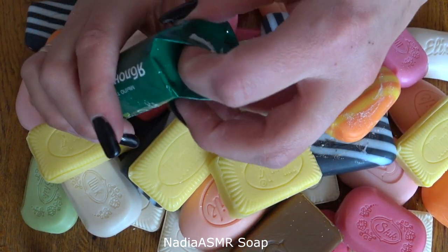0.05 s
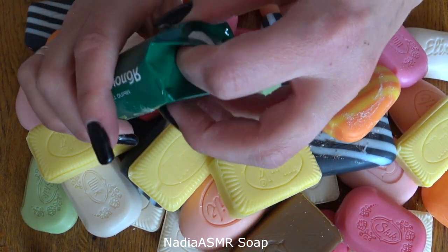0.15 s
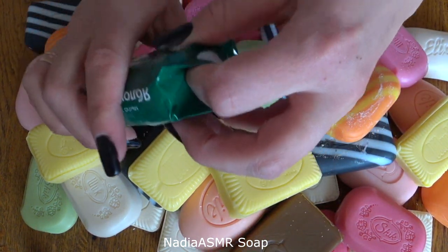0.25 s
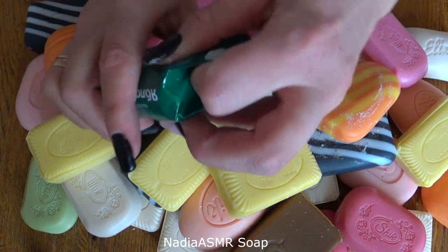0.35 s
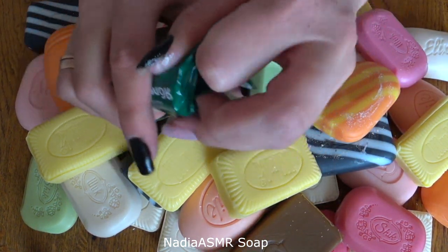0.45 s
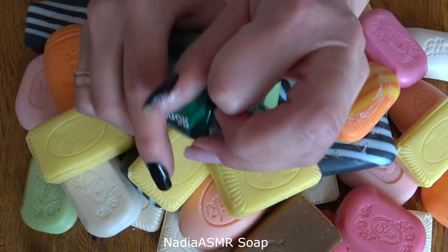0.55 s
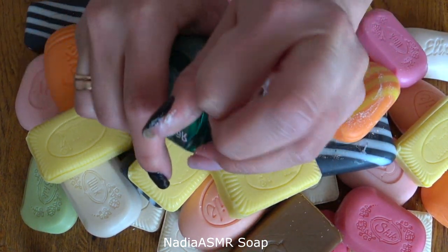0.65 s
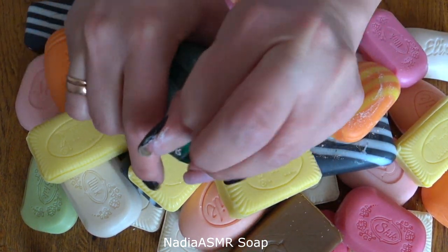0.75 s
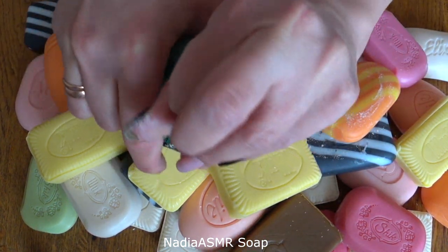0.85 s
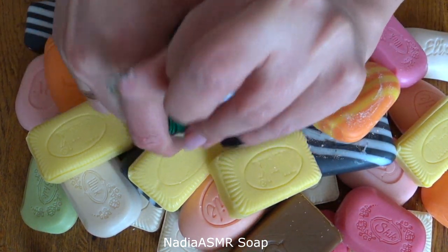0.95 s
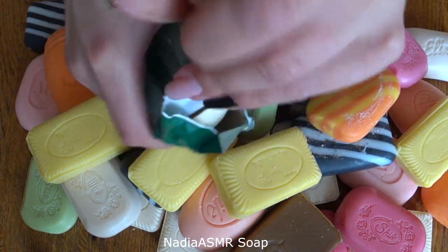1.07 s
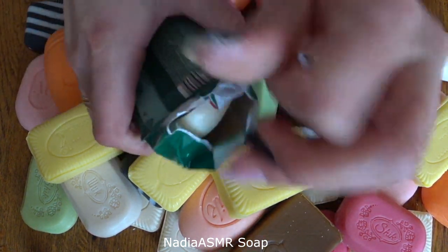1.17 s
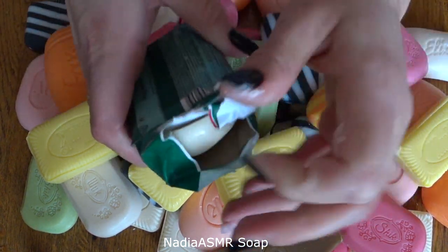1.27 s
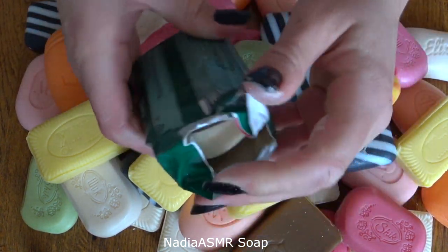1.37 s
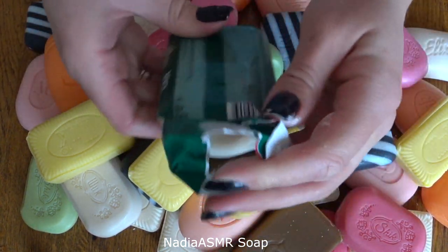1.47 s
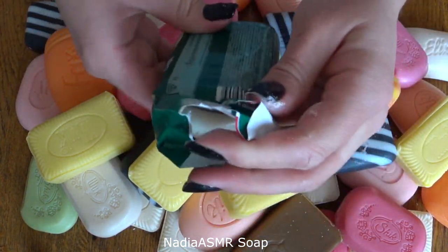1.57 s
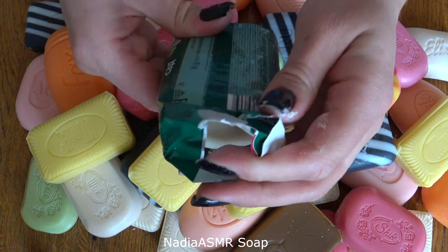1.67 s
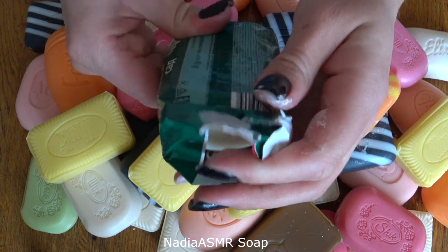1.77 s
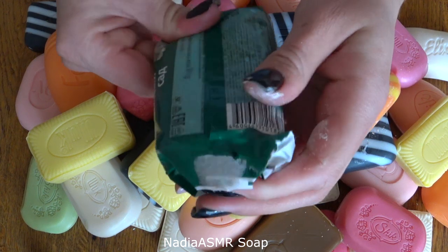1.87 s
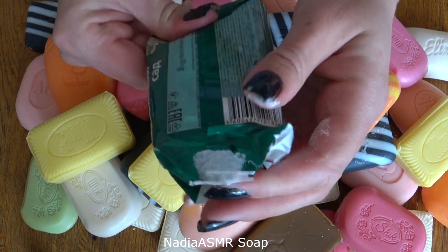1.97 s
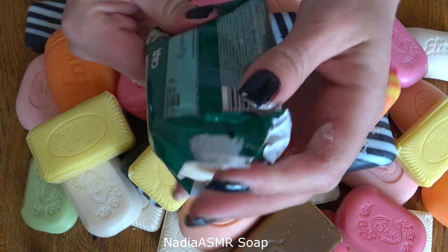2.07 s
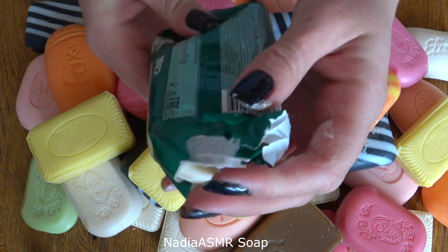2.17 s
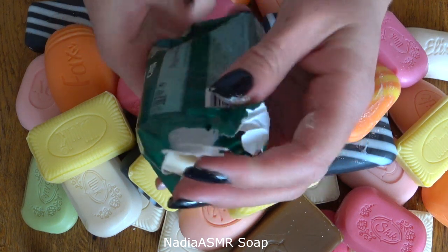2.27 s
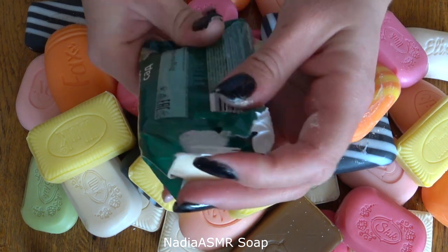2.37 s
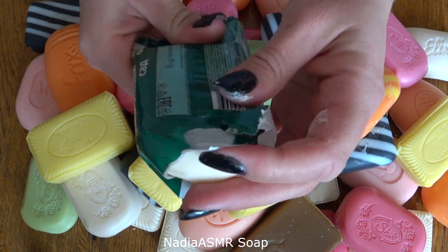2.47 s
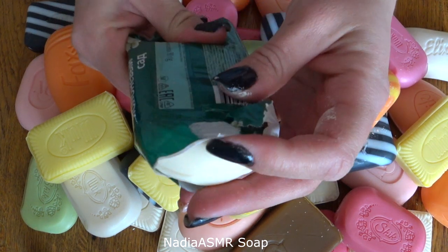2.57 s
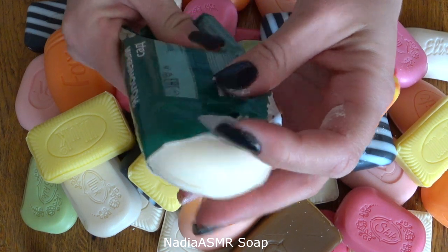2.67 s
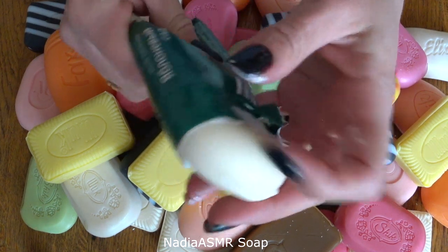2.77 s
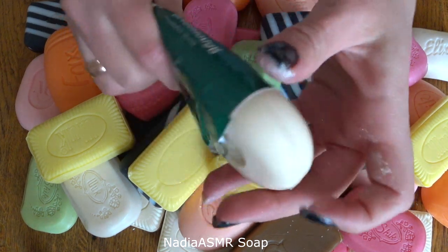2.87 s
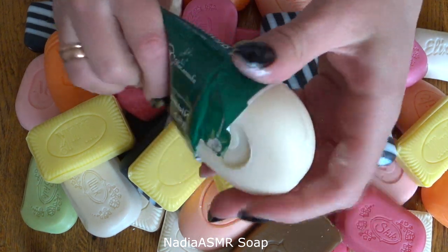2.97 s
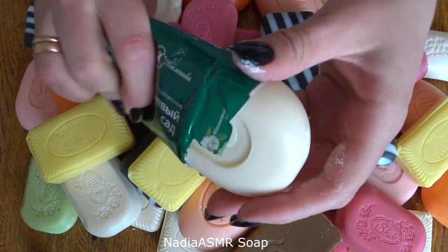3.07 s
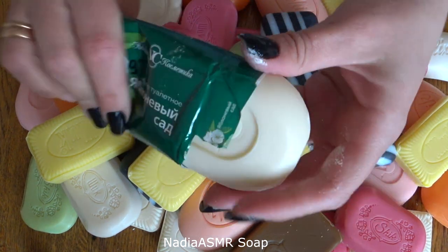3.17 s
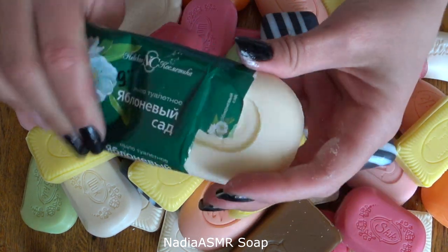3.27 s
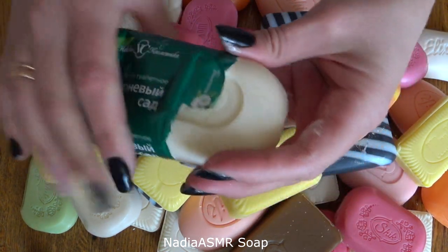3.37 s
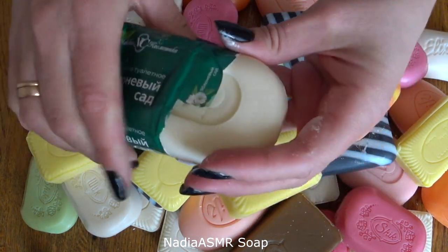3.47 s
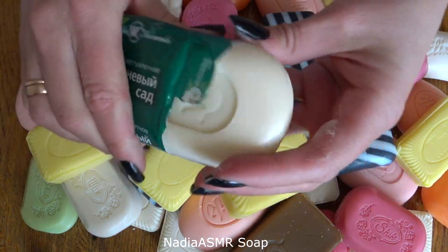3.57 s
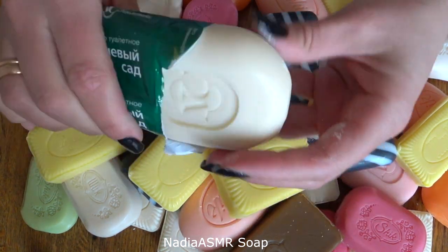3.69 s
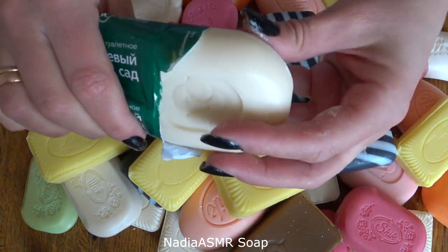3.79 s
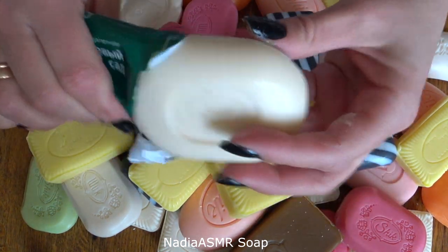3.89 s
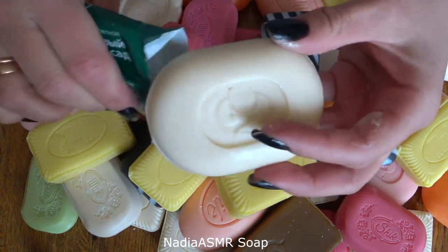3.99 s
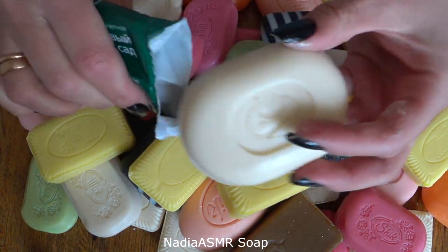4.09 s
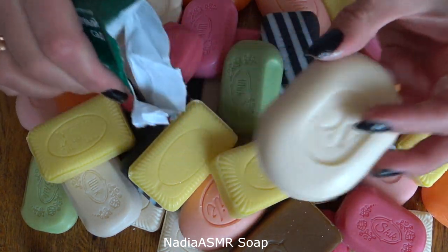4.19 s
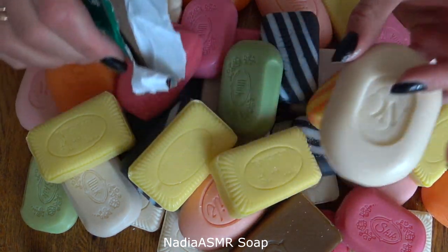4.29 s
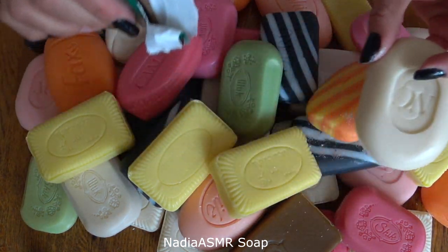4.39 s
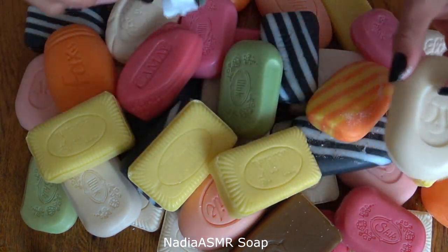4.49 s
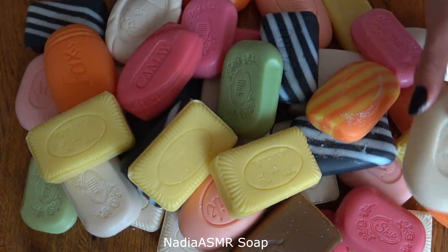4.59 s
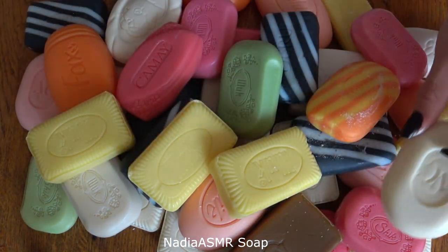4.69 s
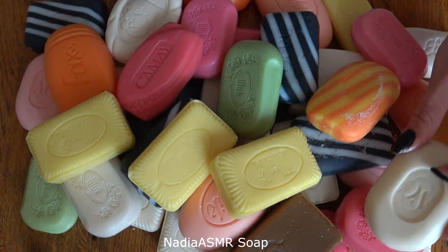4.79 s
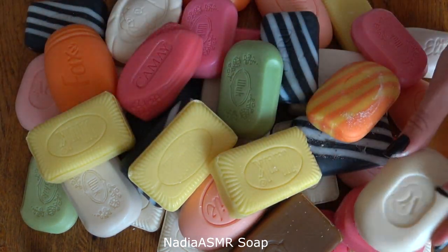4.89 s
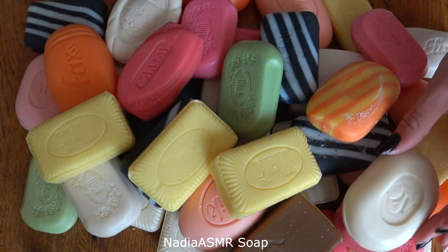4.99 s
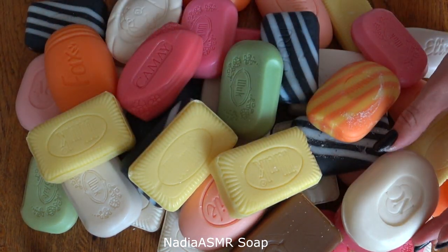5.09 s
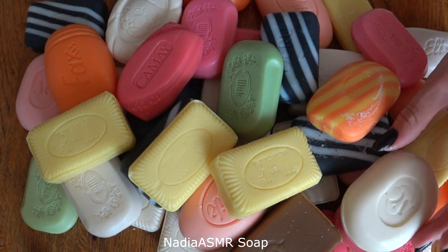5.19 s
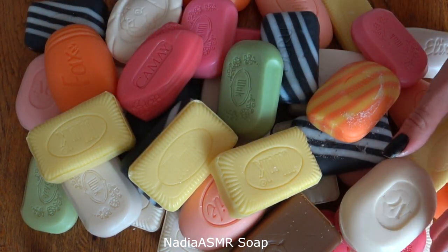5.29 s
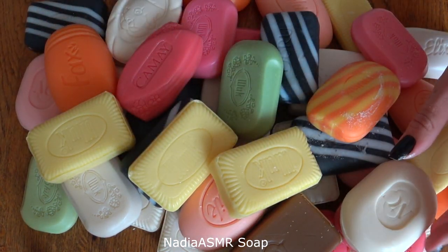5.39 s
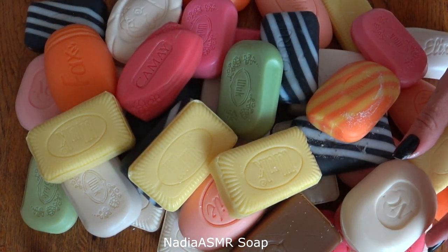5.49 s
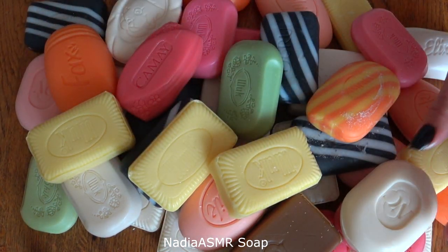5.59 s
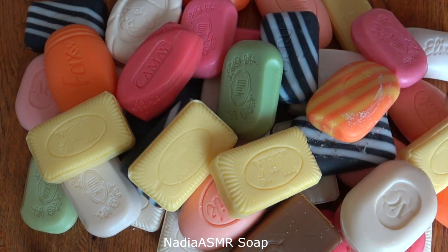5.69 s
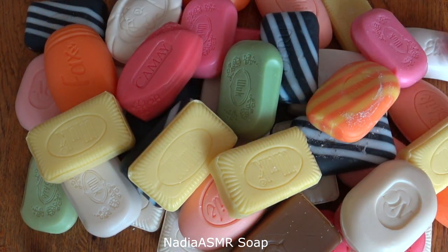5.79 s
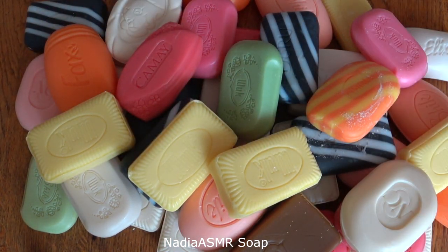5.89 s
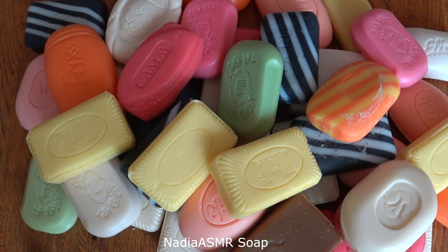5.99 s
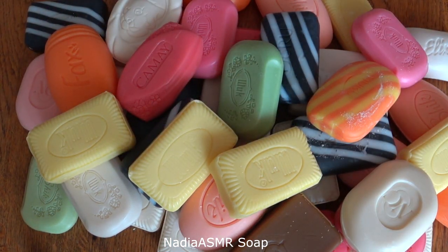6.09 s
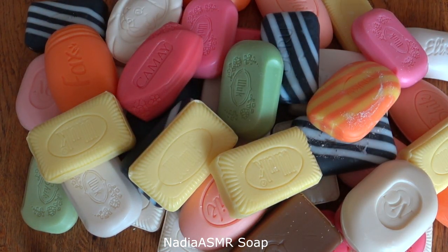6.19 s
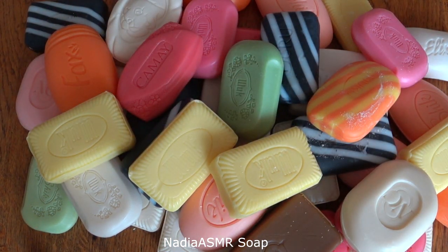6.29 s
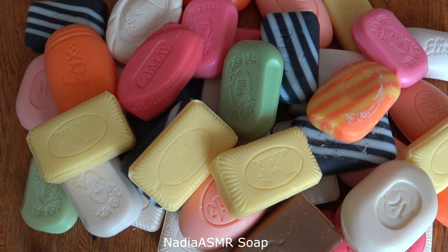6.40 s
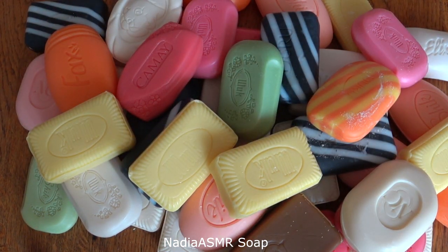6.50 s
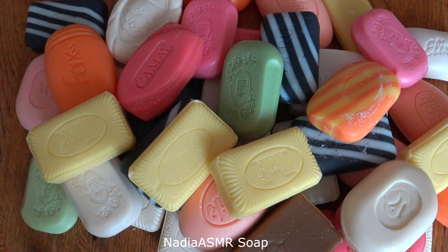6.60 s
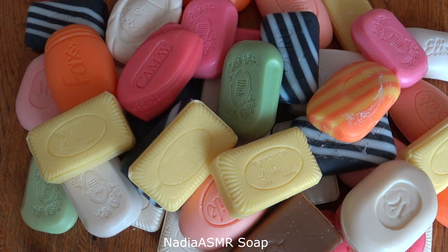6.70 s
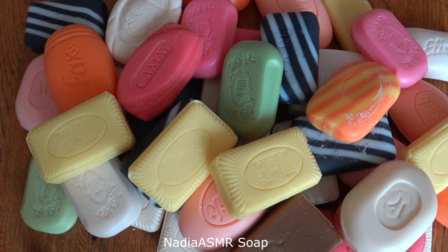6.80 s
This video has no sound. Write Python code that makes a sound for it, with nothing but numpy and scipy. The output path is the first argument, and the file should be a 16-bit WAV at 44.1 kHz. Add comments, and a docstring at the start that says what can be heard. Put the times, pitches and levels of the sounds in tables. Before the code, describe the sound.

Close, crisp crackling of a plastic soap wrapper peeled by hand, followed by a knock and softer taps as the bar is laid down.

```python
"""Unwrapping a bar of soap

Hands crumple, tear and peel the film close to a stereo microphone. Creases buckle one by one, each
ringing a small panel, over fine crackle, sliding friction and the thumps of fingers on the bar.
Laid on a wooden table, the bar knocks three times; a small quiet room answers over hum and hiss."""
import sys
import numpy as np
from scipy import signal
from scipy.fft import rfft, irfft
from scipy.io import wavfile
from scipy.ndimage import uniform_filter1d

SR = 44100
rng = np.random.default_rng(int(sys.argv[2]) if len(sys.argv) > 2 else 0)


def generate_wav(signal):
    """Clip the signal to [-1, 1] and save it as 16-bit WAV at the path in sys.argv[1]."""
    frames = np.transpose(np.atleast_2d(signal))
    scaled = np.clip(frames, -1, 1) * 32767
    pcm = np.round(scaled).astype(np.int16)
    wavfile.write(sys.argv[1], SR, pcm)


N = 302085
TOP_HZ = 10950
SIDES = np.array([[1], [-1]])  # opposite signs for left and right


def undb(db):
    """Amplitude ratio of a level in decibels."""
    return 10 ** (np.asarray(db) / 20)


def level(x, db):
    """Normalisation to an rms level."""
    return x * undb(db) / np.sqrt(np.mean(x ** 2))


def band(x, lo_hz, hi_hz, order=2):
    """Butterworth band-pass filtering."""
    return signal.sosfilt(signal.butter(order, [lo_hz, hi_hz], "bandpass", fs=SR, output="sos"), x)


def coloured(spectrum):
    """Spectral shaping of white noise by (frequency [Hz], level [dB]) points."""
    hz, db = np.transpose(spectrum)
    size = N + 1
    f = np.fft.rfftfreq(size, 1 / SR) + 1
    gain = undb(np.interp(np.log(f), np.log(hz), db))
    return irfft(rfft(rng.standard_normal(size)) * gain, size)[:N]


def add(out, s, x, pan_db):
    """Superposition of a sound at time s, with a left-minus-right level difference."""
    i = int(s * SR)
    x = x[:N - i]
    out[:, i:i + len(x)] += x * undb(SIDES * pan_db / 2)


# Background spectra, mid and side: (frequency [Hz], relative density [dB])
MID_SPECTRUM = [(15, -48), (25, -7), (54, -8.5), (75, -10), (151, -12), (176, -10), (221, -10.5),
                (309, -14), (420, -15.5), (478, -20), (5190, -33), (10600, -30), (11500, -27), (15000, -77),
                (22000, -120)]
SIDE_SPECTRUM = [(15, -33), (25, -29), (54, -4), (117, -2.5), (360, 0.5), (798, -0.5), (1270, -2),
                 (5610, -19), (7630, -15.5), (10600, -20), (11500, -17), (15000, -66), (22000, -120)]
# Mains hum and a faint high tone: (frequency [Hz], rms level [dB])
HUM_TONES = [(50, -68), (150, -80.5), (9711, -101)]
def background(mid_db=-65, side_db=-59.5):
    """Stationary noise: room murmur and microphone hiss spread wide around a centred hum."""
    t = np.arange(N) / SR
    hum = sum(np.sqrt(2) * undb(db) * np.sin(2 * np.pi * hz * t) for hz, db in HUM_TONES)
    return hum + level(coloured(MID_SPECTRUM), mid_db) + SIDES * level(coloured(SIDE_SPECTRUM), side_db)


# The thud, crack and tick bands of a crease: (lower edge [Hz], upper edge [Hz])
CREASE_BANDS = [(520, 1600), (1600, 4500), (4500, 11500)]
BURST_MS, LEAN_DB = [1.45, 1.83, 1], [3, 3.5, -0.7]  # per band: decay time; left minus right
# Crackle envelope: (time [s], crack level [dB], thud level [dB], tick level [dB])
CRACKLE_LEVELS = [(0.0, -64, -60, -54), (0.23, -42.5, -46.5, -46.5), (0.38, -53, -56.5, -46),
                  (0.65, -48, -60, -47), (0.84, -56, -76, -44), (1.05, -36.5, -54, -35),
                  (1.16, -59, -66, -56), (1.41, -56.5, -63, -55), (1.89, -52, -66, -49),
                  (2.27, -58.5, -63.5, -55), (2.46, -60, -58.5, -53.5), (2.61, -55, -57.5, -39.5),
                  (2.67, -44, -55, -36.5), (2.8, -61, -64, -61), (2.94, -62, -76, -61),
                  (3.2, -63, -68, -50.5), (3.39, -63, -63.5, -61.5), (3.57, -63.5, -59.5, -55.5),
                  (3.68, -43.5, -43, -42.5), (3.79, -55, -55, -60), (3.87, -52, -57, -54.5),
                  (3.97, -44.5, -41, -66), (4.1, -54, -69, -52.5), (4.23, -72, -71, -67.5),
                  (4.43, -78.5, -75.5, -73.5), (4.88, -81, -82, -75), (5.02, -74, -66, -74.5),
                  (5.15, -78.5, -77, -78), (5.42, -72.5, -76, -73), (5.99, -67.5, -64.5, -66),
                  (6.26, -77.5, -73, -76), (6.85, -84, -77, -84)]
def crackle(per_second=600, spread_db=2.5, colour_db=4, rub=0.45, taut_hz=(3050, 3650), taut_db=-15):
    """Shot noise: tiny creases give way at random over the smooth rub of skin on film."""
    s, crack_db, thud_db, tick_db = np.transpose(CRACKLE_LEVELS)
    t, out = np.arange(N) / SR, 0
    struck = rng.random(N) < per_second / SR
    size_db = np.minimum(spread_db * rng.exponential(size=N), 9)
    pan_db = 3 * rng.standard_normal(N)
    for k, db in enumerate([thud_db, crack_db, tick_db]):
        tint_db = colour_db * np.clip(rng.standard_normal(N), -2, 2)
        kicks = struck * undb(size_db + tint_db + SIDES * (pan_db + LEAN_DB[k]) / 2)
        fade = np.exp(-1000 / (BURST_MS[k] * SR))
        envelope = level(signal.lfilter([1], [1, -fade], kicks), 0) + rub
        grains = band(envelope * rng.standard_normal(N), *CREASE_BANDS[k], order=3)
        out = out + level(grains, np.interp(t, s, db))
    taut = band(envelope * rng.standard_normal(N), *taut_hz)  # stretched film sings with the tick band
    return out + level(taut, taut_db + np.interp(t, s, tick_db))


# Buckling creases: (time [s], level [dB], panel frequency [Hz],
# relative thud level [dB], relative crack level [dB], relative tick level [dB])
CREASES = [(0.022, -20.5, 8200, -16, -12, -17), (0.035, -21, 1970, -38, -4, -1),
           (0.065, -38, 1340, 1.5, -14, -4.5), (0.097, -23.5, 1280, -4, -12, -21),
           (0.12, -23.5, 4240, -8, 2, 7.5), (0.126, -27, 3400, -13, -17, 6),
           (0.161, -19, 1970, -16, -23, -2), (0.187, -11.5, 2630, -16, -35, 2.5),
           (0.249, -9.5, 2060, -29, -6.5, -1), (0.261, -22, 1320, 2.5, -1, -4),
           (0.27, -8, 7950, -38, -8, -0.5), (0.289, -36, 2050, -27, -9, -14),
           (0.315, -6.5, 6600, -33, -7, -7.5), (0.329, -26.5, 6030, 0.5, -7, -11),
           (0.359, -12, 1880, -5.5, -13, -25), (0.453, -17.5, 4630, -41, -9.5, -12),
           (0.474, -27, 1380, -27, -13, 3), (0.516, -5, 8000, -34, -15.5, -7.5),
           (0.548, -8.5, 5000, -27, -13.5, -3.5), (0.584, -20, 3140, -11, -1.5, -3),
           (0.589, -10.5, 6550, -16, -19, -3), (0.634, -14, 5780, -36, -15, -1),
           (0.643, -18, 6540, -31, -17, -9), (0.666, -17, 7300, -40, -17, -16),
           (0.673, -10, 6650, -40, -7, 3.5), (0.676, -12.5, 3280, -46, -22, -15),
           (0.688, -25, 2550, -31, 6, 7), (0.694, -8.5, 6150, -43, -15, -3), (0.715, -20, 2480, -36, -3, 0),
           (0.745, -24.5, 3400, -39, -5.5, 5.5), (0.779, -25, 6580, -32, -9, -15),
           (0.799, -35, 7200, -19, -11, -6), (0.804, -22, 6700, -35, -6, -1),
           (0.82, -20, 2460, -25, -10, -4), (0.829, -12, 10100, -34, -17.5, -17),
           (0.891, -22, 3450, -24, -4.5, 3), (0.9, -14, 6920, -33, -25, -9),
           (0.922, -15.5, 5290, -39, -16, -1), (0.933, -5, 6860, -45, -22, -5),
           (0.94, -12.5, 2760, -38, -6, -3), (0.944, -9, 4840, -41, -9.5, -18),
           (0.955, -23, 7500, -35, -20, -11), (0.965, -5.5, 7800, -33, -14, -6),
           (0.972, -10.5, 5330, -48, -14, -5.5), (0.976, -12, 6600, -46, -29, -3),
           (0.984, -14.5, 7550, -40, -27.5, -7), (1.033, -16, 8200, -23, -8, -13.5),
           (1.039, -9.5, 1900, -26, -5.5, -15), (1.043, -7.5, 9870, -20, -14, 0),
           (1.048, -4.5, 5360, -16, -16, -5), (1.058, -16, 2500, -14, -21, -9),
           (1.112, -16.5, 2570, -16, -3, 4), (1.15, -15, 4870, -18, -5.5, -1.5),
           (1.16, -15, 2570, -21, -19, -15), (1.17, -20, 4990, -6.5, -8, -2),
           (1.177, -32, 6050, -24, -2.5, 1), (1.203, -22, 5740, -27, -3.5, -2),
           (1.21, -22, 7250, -25, -21, -3), (1.262, -36, 6330, -6, -20, -1),
           (1.286, -29.5, 6800, -39, -27, 1.5), (1.317, -22.5, 7700, -32, -20.5, -13),
           (1.338, -31, 2670, -11, -9.5, -13), (1.353, -26, 2960, -16, -6, -5),
           (1.371, -7, 6650, -25.5, -10.5, -8.5), (1.385, -10, 8250, -26, -18, -11),
           (1.405, -25.5, 6450, -31, -6, 2), (1.442, -25, 6440, -17.5, -7, -1),
           (1.493, -20.5, 1880, -8, -9.5, -10), (1.561, -8.5, 6270, -54, -11.5, -10.5),
           (1.627, -24, 1540, -20.5, -11.5, -14), (1.641, -11, 2050, -21, -3, -9),
           (1.65, -18.5, 2040, -19, 0.5, 5), (1.685, -6, 7800, -48, -34, -3.5),
           (1.747, -28, 3980, -18, -22, 0), (1.763, -16.5, 1426, -14.5, -13.5, -10),
           (1.827, -23, 6700, -20, -6.5, -2), (1.863, -21, 5670, -11, -8, -17),
           (1.874, -10.5, 8100, -33, -23, -6), (1.879, -5, 3940, -36, -8, -7),
           (1.895, -2, 7640, -44, -23, -12), (1.92, -12.5, 2630, -5.5, -2, 2.5),
           (1.943, -13, 4300, -18, -13, -17), (1.949, -15.5, 7900, -26, -24, -6),
           (1.959, -25, 4150, -11, -22, -1), (1.982, -30, 2740, -8, -18, 10),
           (2.012, -18.5, 6600, -18, -10, 0), (2.087, -26, 2470, -13, -12, -8.5),
           (2.131, -16, 5960, -29, -9.5, -15), (2.163, -24, 10000, -13, -11, -15),
           (2.172, -27, 2520, -30, -12, -16), (2.217, -29, 2030, -7, -4, 0),
           (2.225, -11.5, 1930, -10.5, -4, 0.5), (2.338, -40, 2520, -21, -15, -13.5),
           (2.392, -21.5, 4700, -15, -6, -12), (2.404, -22.5, 2540, -18, 4.5, -19),
           (2.412, -23.5, 1380, -16, 3.5, 7), (2.418, -26, 1200, -11, 2, 5.5),
           (2.468, -24, 3130, -34, 1.5, 0), (2.508, -19.5, 6660, -23, -23, -4),
           (2.517, -22, 6560, -26, -17, -7), (2.528, -14.5, 10300, -20.5, -20, -8),
           (2.545, -7.5, 9820, -32, -26, -10), (2.555, -6, 9500, -43, -43, -4),
           (2.559, -8, 8600, -51, -31, -10), (2.568, -7, 9200, -44, -39, -20),
           (2.612, -17, 6840, -38, -34, -5), (2.624, -9.5, 7540, -41, -39, -10),
           (2.651, -15, 6900, -43, -33, -7), (2.665, -19.5, 6800, -35, -20, 3),
           (2.689, -27, 3660, -36, -14, 5), (2.701, -11, 7460, -28, -7.5, -4),
           (2.713, -14, 1810, -17, -9, -1.5), (2.723, -21, 1300, -17, 0, 6),
           (2.734, -19, 6560, -37, -14, -12), (2.757, -18.5, 7850, -25, -11, -9),
           (2.785, -16, 2190, -26, -4, 1.5), (2.908, -15.5, 4600, -13, -10.5, -11),
           (3.038, -14.5, 4270, -55, -31, -6), (3.073, -30.5, 4170, -38, -24, -10),
           (3.113, -35, 7690, -26, -23, -12), (3.16, -35, 5450, -17, -22, -13),
           (3.177, -34, 5240, -15, -12, -1), (3.187, -29, 1310, -5, -3, -3),
           (3.224, -20.5, 1380, -7, -3, -11), (3.25, -31, 1960, -8, -15, -16),
           (3.269, -33, 1020, -22, -2, -18), (3.299, -32.5, 1030, -19, 3.5, -18),
           (3.329, -32, 1110, -21, -5, -17), (3.404, -41.5, 1030, -18, 1.5, 2.5),
           (3.428, -33, 9340, -27, -5, 0), (3.442, -42.5, 1420, -4, -1, 9),
           (3.463, -39, 3030, -15.5, -9, -8.5), (3.494, -40, 1360, -9, -1, -13),
           (3.537, -45, 1360, 5, -16, -3), (3.573, -26.5, 1330, -18, -6, 4),
           (3.586, -22.5, 2580, -23, -7.5, -3), (3.619, -17, 7180, -15, -22, -17),
           (3.623, -16.5, 1280, -22, -17, -5), (3.632, -20.5, 1380, -1, 1, 1.5),
           (3.644, -10, 7240, -21.5, -11, -13.5), (3.651, -16, 8140, -28, -16, -6),
           (3.658, -12, 5500, -20, -18, 1), (3.695, -4.5, 5820, -34, -17, -8.5),
           (3.702, -18, 5300, -19, -9, -1.5), (3.711, -18.5, 1360, -6, -3.5, -12),
           (3.726, -14.5, 1065, -7, -21, -24), (3.804, -18, 1570, -2.5, -11.5, -5.5),
           (3.881, -19, 7400, -40, -35, -3), (3.895, -5.5, 5960, -17.5, -17.5, -2),
           (3.899, -24, 1280, -19, -13, -1), (3.908, -7.5, 7370, -21, -11.5, -9),
           (3.915, -20.5, 1410, -12, -1, 5), (3.926, -4.5, 7260, -25, -18, -6),
           (3.934, -14.5, 1150, -31, 2, 6), (3.942, -24.5, 2080, -5, 8, 0), (3.974, -21, 2850, -18, -8, 3),
           (4.023, -9, 7300, -19, -11, -9), (4.063, -28.5, 1050, -23, -18, -5),
           (4.076, -29.5, 1020, -7, -2, 10), (4.082, -26, 1410, -5, -2.5, -12),
           (4.09, -30.5, 1100, -8, -10, 7), (4.155, -32.5, 8100, -16, -25, -4),
           (4.255, -39, 2950, -9, -12, 1.5), (4.294, -42.5, 1320, -3.5, -9, -16),
           (5.319, -33, 1030, -2, -13.5, -4.5), (5.521, -43.5, 1320, -7, -4, -1),
           (5.56, -39, 1780, 3.5, 0, 5), (5.613, -40.5, 3750, -10, -7, 0), (5.732, -24, 1280, -7, -10, -11),
           (5.752, -33, 1740, -8, -1.5, 3.5), (5.762, -35, 1210, -9, -21, -19),
           (5.8, -39, 1430, -12, -16, -6), (5.825, -37, 1320, -2, -9, -3), (5.859, -40.5, 2730, -21, -6, 2),
           (5.867, -41, 1410, -20, -3, 0), (5.888, -41.5, 1550, 7.5, 4, 8),
           (5.982, -38.5, 2170, -25, -10, -1), (6.049, -44, 2310, -9, -17, 2),
           (6.119, -33.5, 7900, -11, -18, -6), (6.156, -39, 5650, -17, -14, -11)]
def snaps(creases, cycles=6.2, ring_db=-3, rise=0.22, creep_db=-16, lead_s=0.003):
    """Snap-through buckling: a crease creeps, then rings its panel and sheds noise in three bands."""
    out, t = np.zeros((2, N)), np.arange(900) / SR - lead_s
    noise = rng.standard_normal((len(creases), len(CREASE_BANDS) + 1, len(t)))
    creep = undb(creep_db) * np.exp(-np.abs(t) * 2 / lead_s)
    bursts = []
    for k, edges in enumerate(CREASE_BANDS):
        age = t * 1000 / BURST_MS[k]
        envelope = creep + (age > 0) * (1 - np.exp(-age / rise)) * np.exp(-age)
        bursts.append(band(envelope * noise[:, k], *edges, order=3))
    for i, (s, db, hz, *parts_db) in enumerate(creases):
        pan_db = 0.5 * noise[i, -1, 0]
        quality = cycles * (hz / 4000) ** 0.15  # large, low panels ring for fewer cycles
        age = np.maximum(t, 0) * hz * np.pi / quality
        ring = (1 - np.exp(-age / rise)) * np.exp(-age) * np.sin(2 * np.pi * hz * t)
        ring_lean_db = np.interp(hz, np.mean(CREASE_BANDS, axis=1), LEAN_DB)
        add(out, s - lead_s, undb(db + ring_db) * ring / np.abs(ring).max(), pan_db + ring_lean_db)
        for part_db, burst, lean_db in zip(parts_db, bursts, LEAN_DB):
            add(out, s - lead_s, undb(db + part_db) * burst[i] / np.abs(burst[i]).max(), pan_db + lean_db)
    return out


def lesser_creases(count=260, above_db=11, octaves=0.37, parts_db=(-38.5, -28.5, -9), colour_db=6):
    """Random point process: rows of small creases that follow the crackle in level and spectrum."""
    s, crack_db, thud_db, tick_db = np.transpose(CRACKLE_LEVELS)
    uniform, normal = rng.random((count, 3)), rng.standard_normal((count, 4))
    times = 0.003 + uniform[:, 0] * (N / SR - 0.006)
    bands_db = np.transpose([np.interp(times, s, db) for db in (thud_db, crack_db, tick_db)])
    share = np.cumsum(undb(2 * bands_db), axis=1)
    pick = (uniform[:, 1:2] * share[:, -1:] > share).sum(axis=1)  # a band's odds follow its power
    centre_hz = np.sqrt(np.prod(CREASE_BANDS, axis=1))[pick]
    hz = np.minimum(centre_hz * 2 ** (octaves * normal[:, 0]), TOP_HZ)
    top_db = bands_db.max(axis=1)
    tint_db = bands_db - top_db[:, None] + parts_db + colour_db * normal[:, 1:]
    return np.column_stack([times, top_db + above_db, hz, tint_db])


# Fingers striking the bar: (time [s], peak level [dB], frequency [Hz])
FINGER_TAPS = [(0.109, -40.5, 320), (1.033, -26, 585), (1.168, -28, 383), (1.919, -28.5, 704),
               (1.993, -41, 657), (2.223, -30.5, 720), (2.711, -32, 760), (3.222, -43, 790),
               (3.296, -35, 626), (3.327, -44, 490), (3.444, -47.5, 272), (3.538, -43.5, 425),
               (3.584, -41.5, 363), (3.62, -28.5, 403), (3.708, -25.5, 560), (3.803, -27, 330),
               (3.915, -36.5, 310), (5.56, -42, 640), (5.729, -35.5, 473), (5.825, -41, 487),
               (5.887, -35.5, 585)]
def thumps(quality=1.8, rise_ms=0.6):
    """Heavily damped oscillation: the hand-held bar answers each tap with a dull thump."""
    out, t = np.zeros((2, N)), np.arange(2000) / SR
    for s, db, hz in FINGER_TAPS:
        envelope = (1 - np.exp(-t * 1000 / rise_ms)) * np.exp(-t * hz * np.pi / quality)
        thump = band(envelope * np.sin(2 * np.pi * hz * t), hz / 2, hz * 2)
        add(out, s, undb(db) * thump / np.abs(thump).max(), LEAN_DB[0])
    return out


# Skin sliding on film: (start [s], end [s], centre [Hz], bandwidth [Hz], mid-stroke level [dB])
STROKES = [(0.188, .36, 1947, 1778, -44), (0.635, 0.77, 3000, 1200, -40.5),
           (0.897, 1.028, 3320, 1800, -41.5), (1.862, 2.018, 2960, 2150, -37),
           (2.487, 2.727, 3190, 500, -49), (3.189, 3.563, 1300, 500, -64), (5.733, 5.902, 1410, 500, -57.5),
           (6.517, 6.653, 2460, 3500, -66.5), (6.046, 6.089, 2250, 3900, -52),
           (6.087, 6.186, 2050, 2500, -55), (6.085, 6.173, 7100, 4930, -53)]
def slides(flutter_db=1.5, flutter_ms=4):
    """Sliding friction: noise in one resonance swells, flutters and fades."""
    out = np.zeros((2, N))
    for start, end, hz, width_hz, db in STROKES:
        hiss, jitter = rng.standard_normal((2, SR // 2))[:, :int((end - start) * SR)]
        flutter = undb(flutter_db * level(uniform_filter1d(jitter, int(flutter_ms * SR / 1000)), 0))
        rub = level(band(hiss * flutter, hz - width_hz / 2, hz + width_hz / 2), db)
        add(out, start, rub * np.sqrt(np.hanning(len(rub))), LEAN_DB[1])
    return out


# Modes of the wooden table: (frequency [Hz], level [dB], 60 dB decay time [s])
TABLE_MODES = [(106.5, -4.5, 0.44), (169.4, -4, 0.18), (261.5, -5, 0.26), (316, -18.5, 0.15),
               (452.3, -2, 0.21), (588.6, 3, 0.047), (656, 1.5, 0.074), (825, 1, 0.076), (980, -5, 0.035)]
# The bar meeting the table: (time [s], level [dB], cutoff [Hz], relative ring level [dB],
# relative rumble level [dB], relative tick level [dB], left minus right [dB])
CONTACTS = [(4.855, -6, 3520, -26.5, -22, -32, 1), (5.0039, -14, 1880, -15.5, -21.5, -24.5, 0.71),
            (5.027, -47, 1715, -10, -10, -28.5, 1), (5.307, -26, 2320, -8.5, -9.5, -27, 0.83),
            (5.345, -29, 1940, -17, -10, -43, 1)]
def knocks(rumble_t60_s=0.33, scatter_db=0.5, swell_ms=1.1):
    """Impact excitation: table modes swell in over rumble; each knock is dulled above its own cutoff."""
    out, t = np.zeros((2, N)), np.arange(SR // 2) / SR
    hz, mode_db, t60 = np.transpose(TABLE_MODES)[:, :, None]
    modes = np.exp(-np.log(1000) * t / t60) * np.sin(2 * np.pi * hz * t)
    scatter = scatter_db * rng.standard_normal((len(CONTACTS), len(TABLE_MODES), 1))
    noise = rng.standard_normal((len(CONTACTS), len(t)))
    swell = 1 - np.exp(-t * 1000 / swell_ms)
    jolt = band(t == 0, 540, 680, order=1) + 0.46 * band(t == 0, 710, 1540, order=1)
    jolt = jolt + 0.7 * np.roll(jolt, int(0.002 * SR))  # the far edge of the bar lands just after
    for contact, offset_db, hiss in zip(CONTACTS, scatter, noise):
        s, db, top_hz, ring_db, rumble_db, tick_db, pan_db = contact
        ring = (undb(mode_db + ring_db - offset_db) * modes).sum(axis=0)
        rumble = level(band(hiss, 136, 617, order=1), rumble_db) * np.exp(-np.log(1000) * t / rumble_t60_s)
        blow = band(jolt / np.abs(jolt).max() + swell * (ring + rumble), 85.5, 6100)
        low_pass = signal.cheby2(6, 45, top_hz, fs=SR, output="sos")
        tick = band(hiss[:400] * np.exp(-t[:400] / 0.0029), 2000, 7000)
        add(out, s, undb(db) * signal.sosfilt(low_pass, blow), pan_db)
        add(out, s, undb(db + tick_db) * tick, pan_db)
    return out


def whistle(start_s=5.75, end_s=6.33, hz=5780, db=-74):
    """Narrow-band noise, heard as a faint, slightly rough high tone."""
    t = np.arange(N) / SR
    gate = np.clip(np.minimum(t - start_s, end_s - t) / 0.024, 0, 1)
    return gate * level(band(rng.standard_normal(N), hz - 90, hz + 90, order=1), db)


# Room octave bands: (centre [Hz], reverberation time [s], level [dB], side relative to mid [dB])
ROOM_BANDS = [(137, .8, -43.5, -13), (293.3, 0.39, -41, -20.5), (600, 0.4, -36.5, -11.5),
              (1200, 0.18, -33.5, -6), (2460, 0.31, -39, -3), (4750, 0.29, -42, -4),
              (7900, 0.16, -37.5, -2)]
def room(x, onset_ms=5):
    """Diffuse reverberation: convolution with decaying noise, uncorrelated between mid and side."""
    t = np.arange(SR // 2) / SR
    onset = np.clip(t * 1000 / onset_ms, 0, 1) ** 2
    tails = 0
    for hz, t60, db, side_db in ROOM_BANDS:
        noise = band(rng.standard_normal((2, len(t))), hz / np.sqrt(2), hz * np.sqrt(2))
        tails = tails + undb([[db], [db + side_db]]) * onset * noise * np.exp(-np.log(1000) * t / t60)
    mid, side = (signal.fftconvolve(x.mean(axis=0), tail)[:N] for tail in tails)
    return mid + SIDES * side


def scene():
    """Superposition of direct sound, reverberation, background and the faint tone."""
    direct = snaps(CREASES) + snaps(lesser_creases()) + crackle() + slides() + thumps() + knocks()
    return direct + room(direct) + background() + whistle()


def record(dry):
    """Band limiting: the recorder cuts the top with a gentle and a steep low-pass."""
    gentle = signal.butter(2, 13000, fs=SR, output="sos")
    steep = signal.ellip(6, 0.5, 33, TOP_HZ, fs=SR, output="sos")
    return signal.sosfilt(steep, signal.sosfilt(gentle, dry))


dry = scene()
out = record(dry)
generate_wav(out)
```